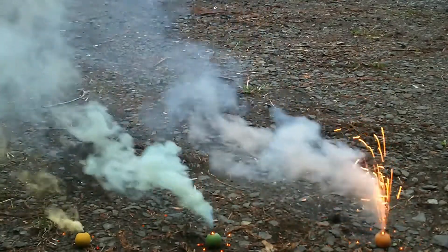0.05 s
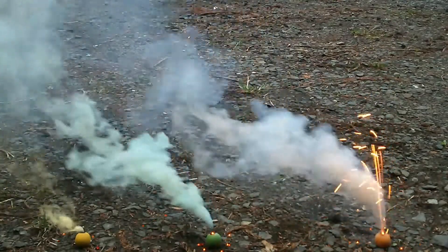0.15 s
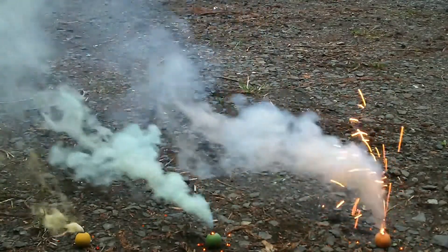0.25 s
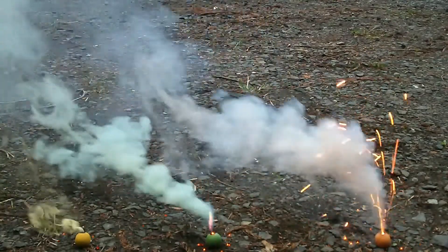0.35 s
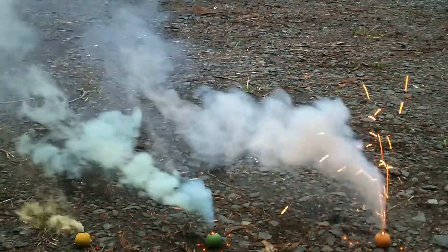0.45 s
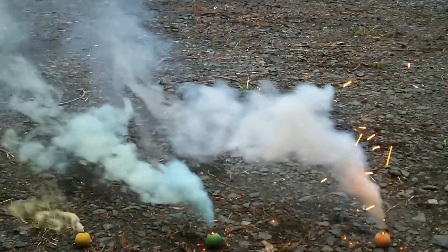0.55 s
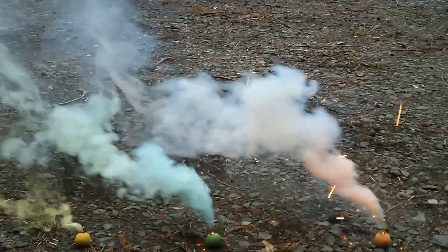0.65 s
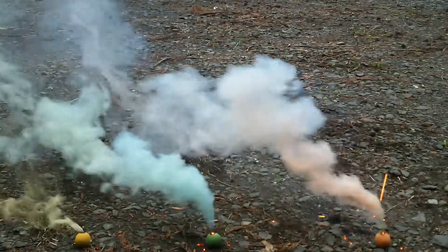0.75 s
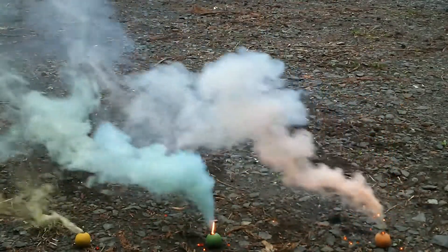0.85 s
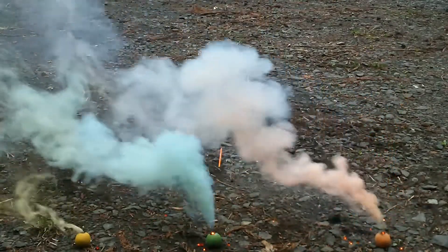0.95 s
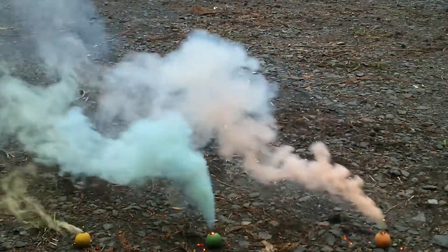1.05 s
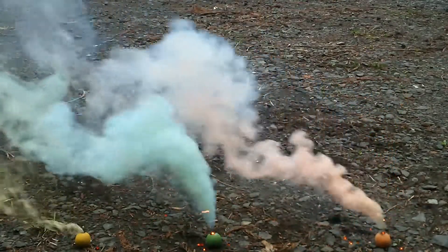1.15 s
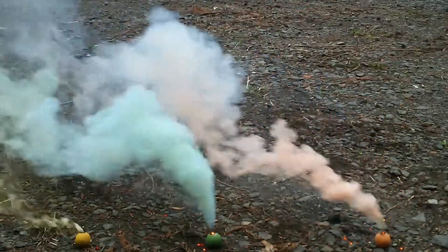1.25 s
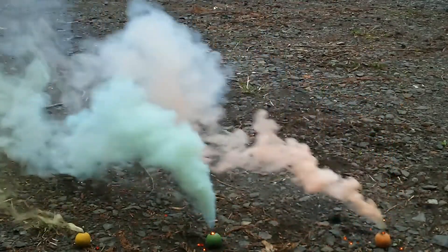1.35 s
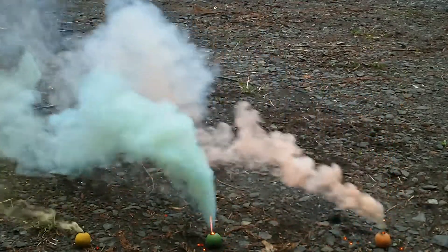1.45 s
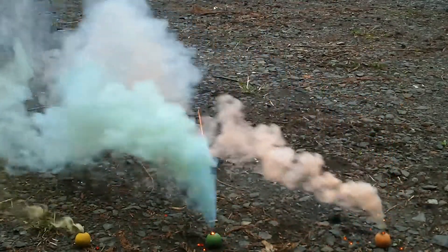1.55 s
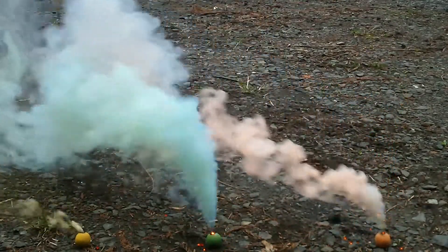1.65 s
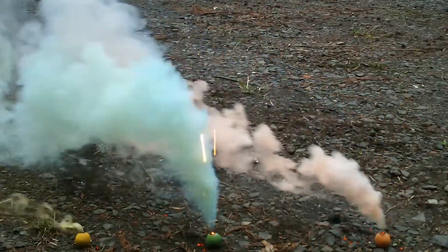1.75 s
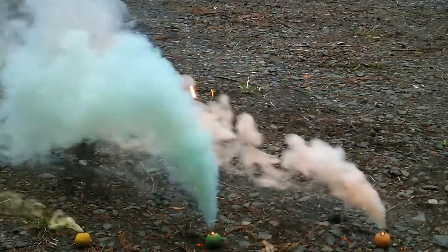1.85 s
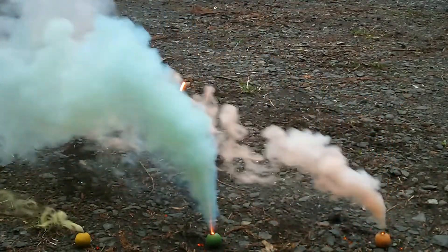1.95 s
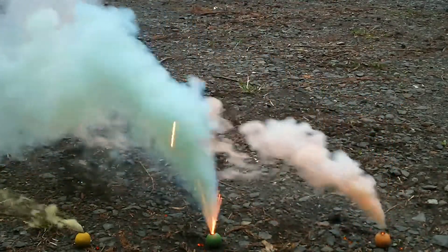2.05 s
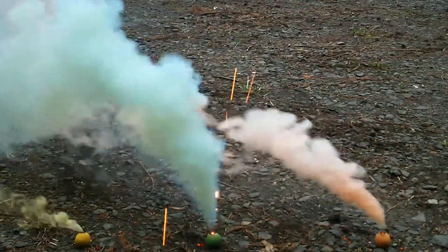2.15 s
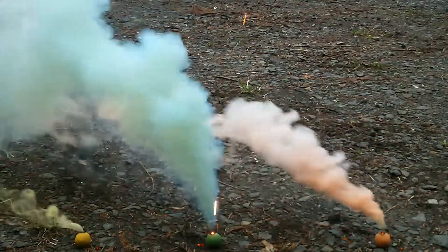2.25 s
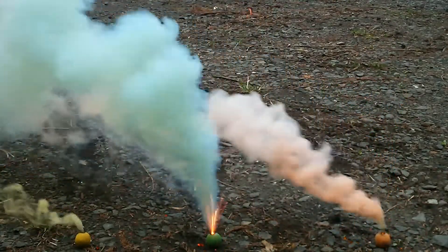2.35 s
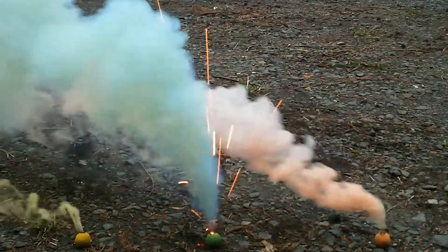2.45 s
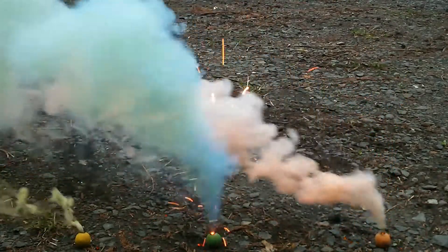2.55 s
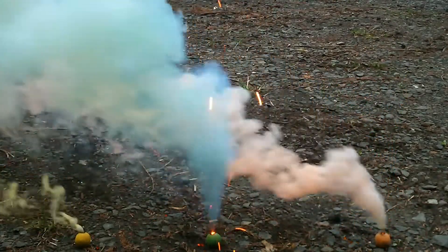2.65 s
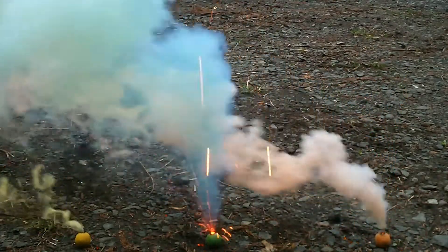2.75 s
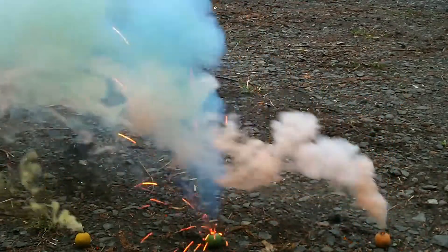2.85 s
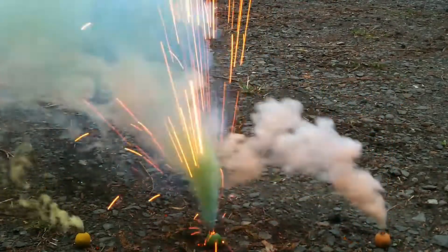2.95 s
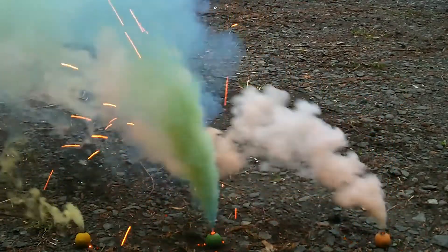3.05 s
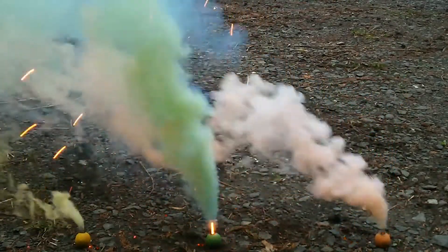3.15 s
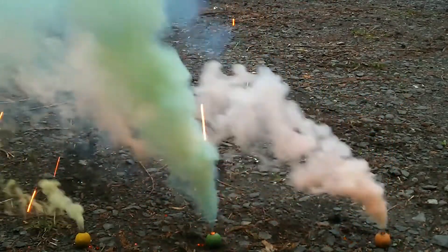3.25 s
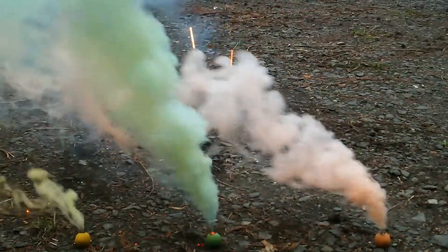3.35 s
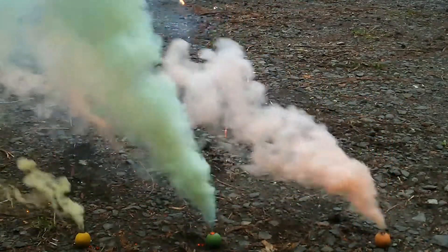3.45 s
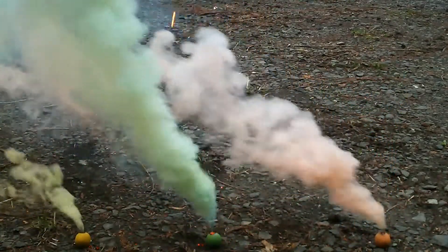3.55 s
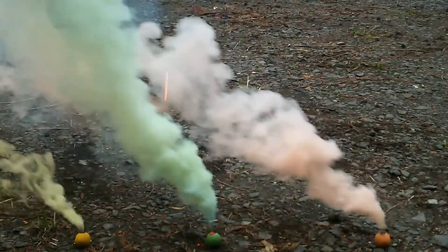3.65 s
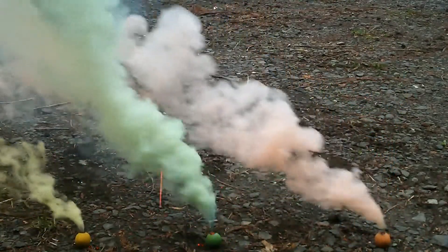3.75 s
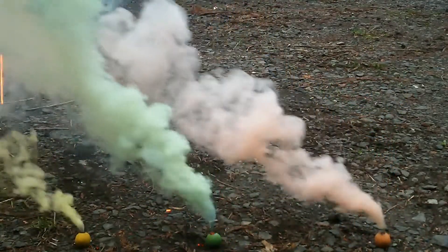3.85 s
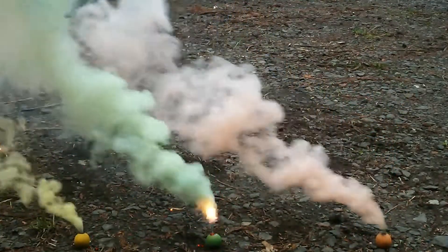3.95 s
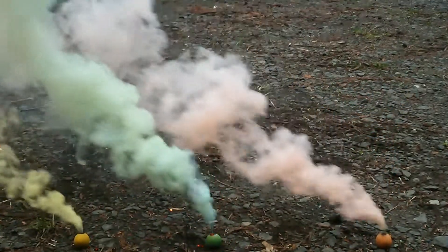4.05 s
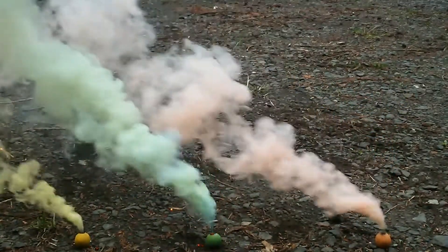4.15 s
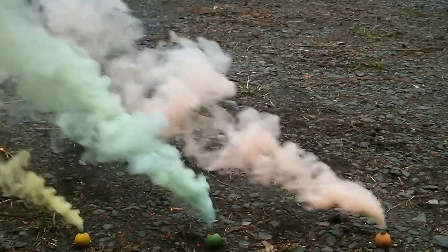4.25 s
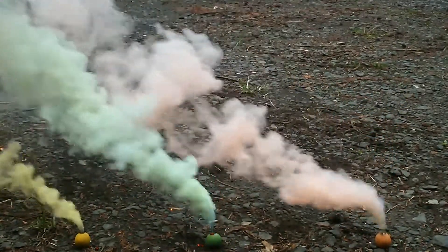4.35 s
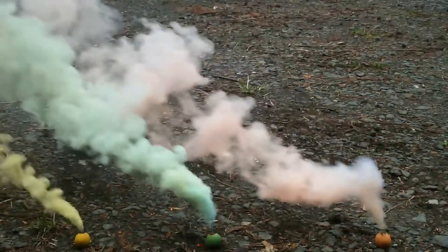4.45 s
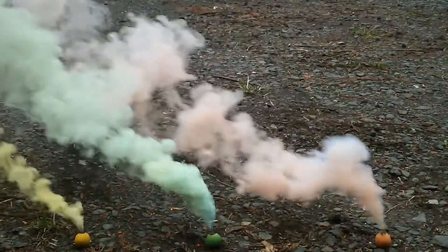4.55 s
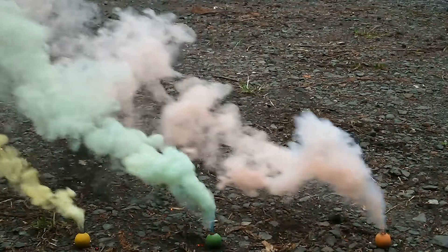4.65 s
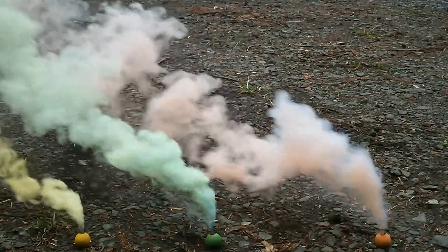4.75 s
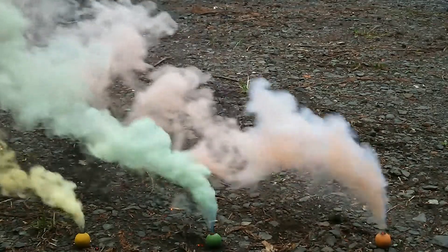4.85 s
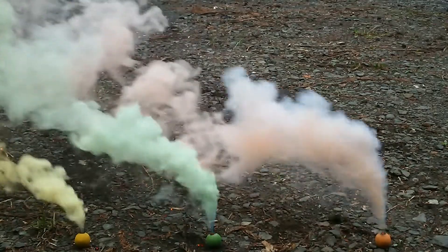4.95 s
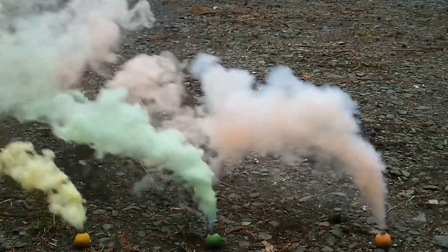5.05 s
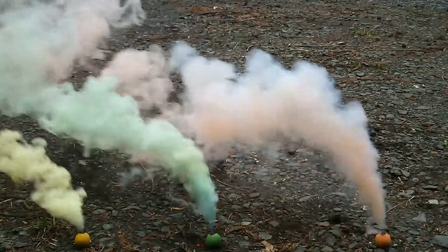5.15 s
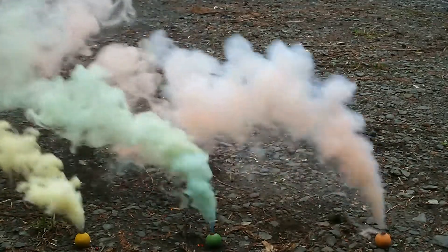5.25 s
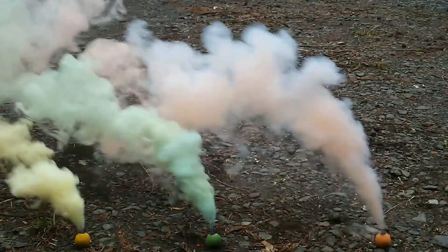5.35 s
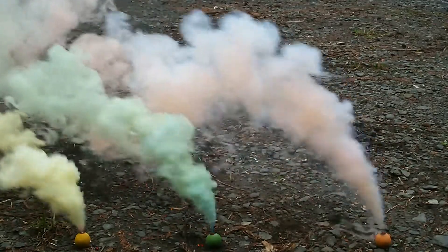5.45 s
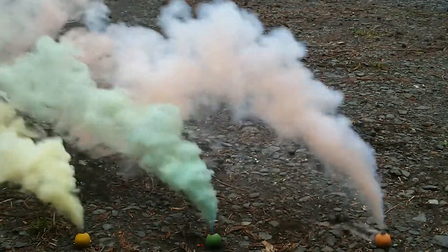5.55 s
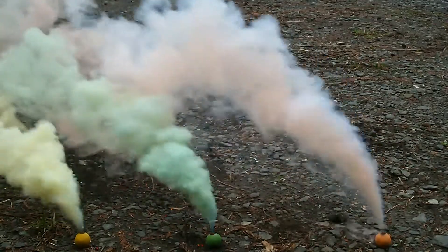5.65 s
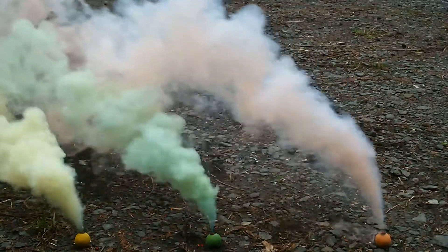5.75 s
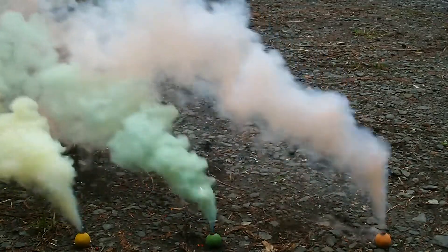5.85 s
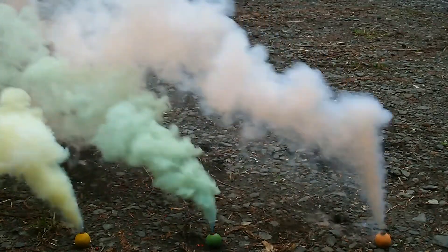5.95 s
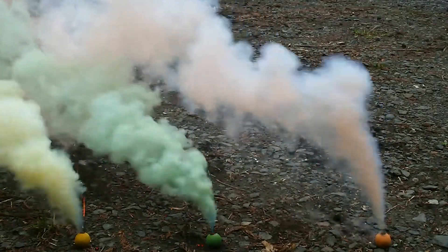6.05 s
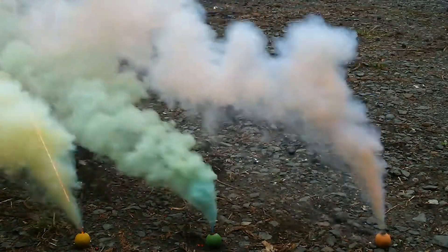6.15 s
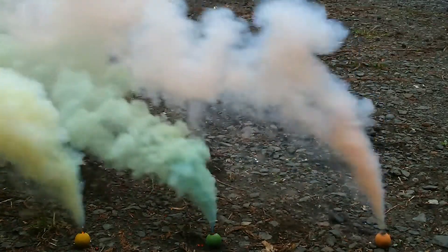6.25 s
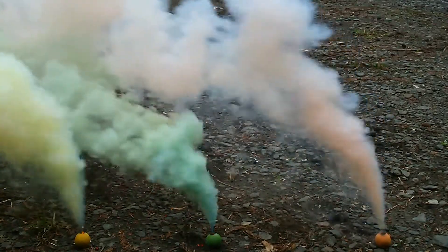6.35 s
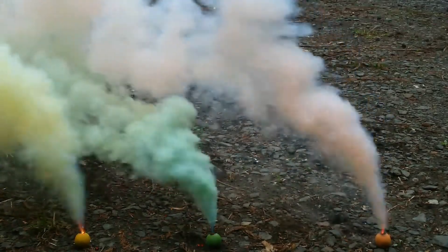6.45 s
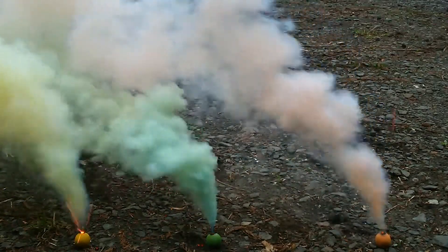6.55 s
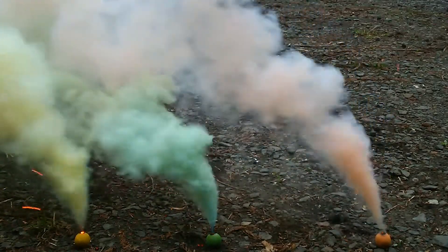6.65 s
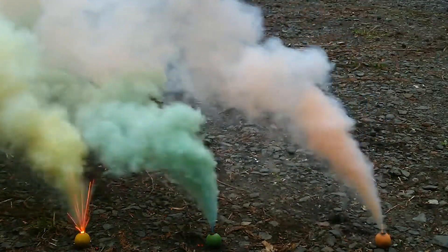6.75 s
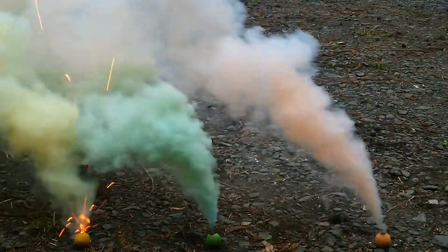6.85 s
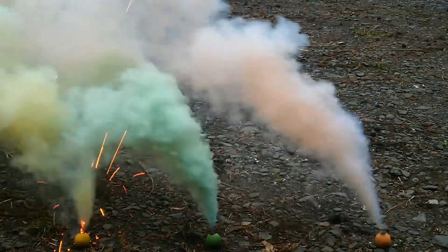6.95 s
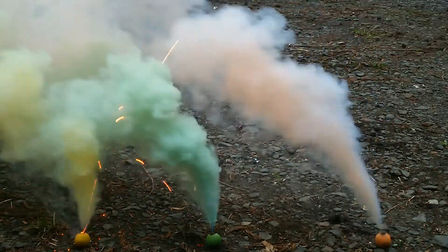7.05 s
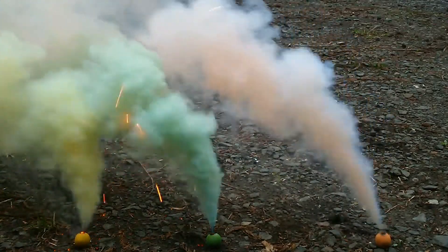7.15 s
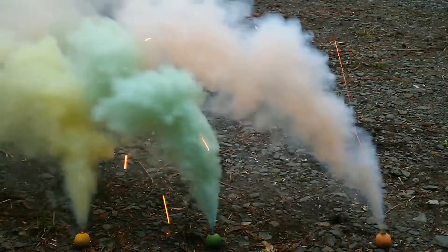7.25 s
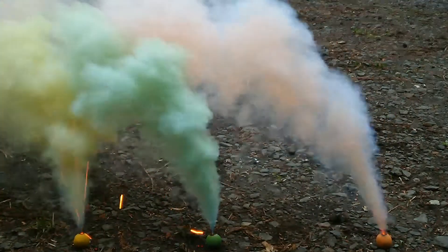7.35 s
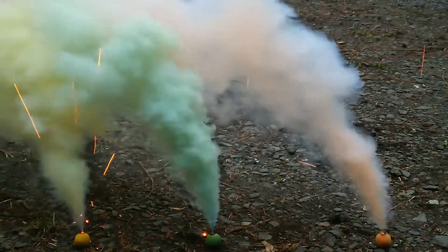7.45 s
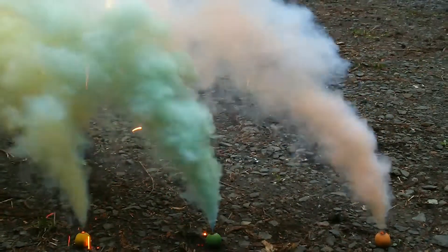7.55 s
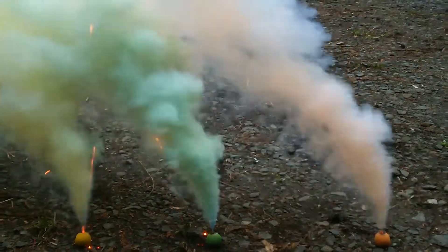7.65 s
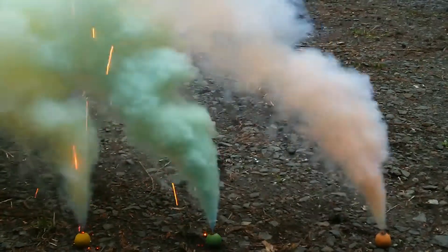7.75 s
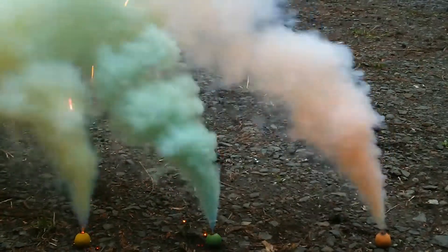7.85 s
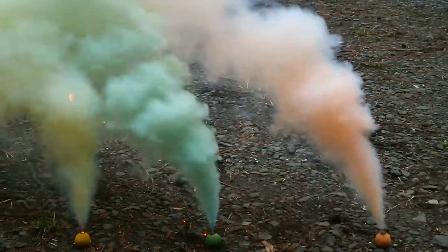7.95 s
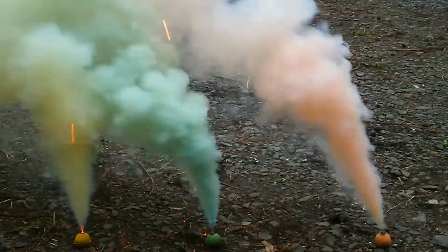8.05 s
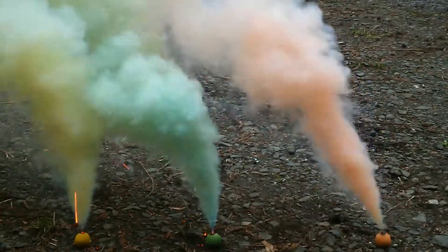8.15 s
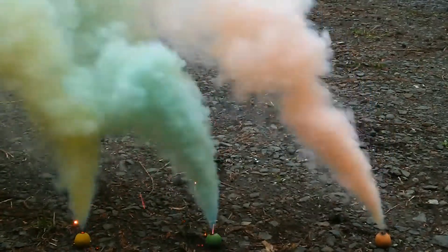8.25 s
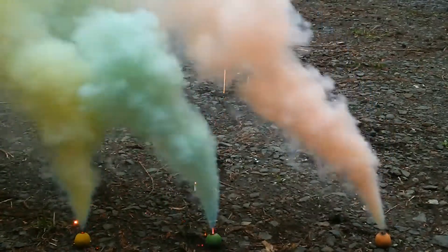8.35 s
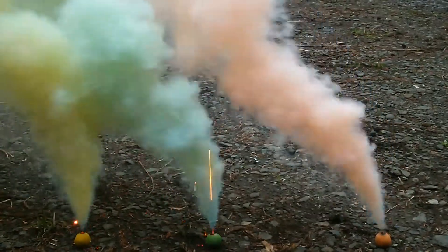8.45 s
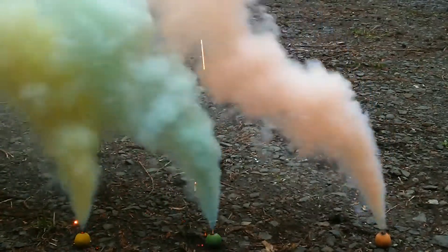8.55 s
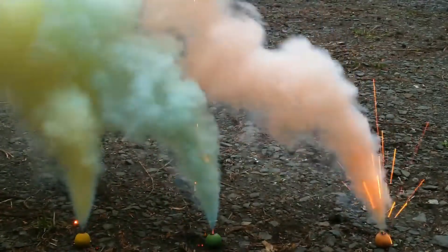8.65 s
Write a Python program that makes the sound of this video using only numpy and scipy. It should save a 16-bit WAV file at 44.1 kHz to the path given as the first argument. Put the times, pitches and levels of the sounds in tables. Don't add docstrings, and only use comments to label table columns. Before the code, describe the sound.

Close, gritty gas hiss from small fireworks on open ground. A sizzling fuse fades, a second vent swells into a forceful rush with a brief dip and spark clicks, and bursts in one hard, dry pop. Afterwards come thin airy wheezes and light sputtering over a low far engine hum, until two more jets build to a steady, strong hiss with dull coughs and sharp cracks. The microphone's gain sinks the background when jets are loud.

```python
import sys
import numpy as np
from scipy import signal
from scipy.fft import rfft, irfft, next_fast_len
from scipy.io import wavfile
from scipy.ndimage import uniform_filter1d

SR = 44100
rng = np.random.default_rng(int(sys.argv[2]) if len(sys.argv) > 2 else 0)


def boost(x):
    u = np.asarray(x, float) / 20
    return 10 ** u


def persist_wave(psi):
    counts = np.round(np.clip(psi, -1, 1) * 32767).astype(np.int16)
    wavfile.write(sys.argv[1], SR, np.atleast_2d(counts).T)


N = 384111
CUTOFF_HZ = 15200

# start_s, level_db
FUSE = [
    (0.0, -37),
    (0.2, -35),
    (0.3, -34.5),
    (0.5, -33),
    (0.6, -43),
    (0.7, -42),
    (0.8, -39.5),
    (1.1, -58),
    (1.3, -48),
]
MIDDLE_JET = [(.8, -64), (.93, -41.5), (1.39, -40.5), (1.62, -32.5), (2.38, -32.5), (2.72, -29.5),
              (3.01, -31), (3.04, -40), (3.27, -41.5)]
LEFT_JET = [(5.8, -45), (5.9, -38), (6.3, -34), (6.6, -32.5), (7.0, -38.5), (7.4, -32), (8.0, -29),
            (8.4, -31), (8.7, -29.5)]
RIGHT_JET = [(4.4, -56), (4.438, -46), (4.47, -39.5), (4.62, -39.5), (4.85, -36.5), (5.3, -38),
             (5.75, -37.5), (5.9, -34.5), (6.7, -39), (7.1, -35.5), (8.7, -37.5)]
# middle_s, change_db, length_s
LULL = [
    (2.32, -42, 0.2),
]


def in_time(rows):
    s, db = np.transpose(rows)
    t = np.arange(N) / SR
    since_start = t - s[0] + (s[0] < .05)
    until_end = s[-1] + .05 - t
    return boost(np.interp(t, s, db)) * np.clip(np.minimum(since_start, until_end) / .02, 0, 1)


def surges(rows):
    t = np.arange(N) / SR
    return sum(db * np.exp(-(2 * (t - s) / length) ** 2) for s, db, length in rows)


def rms_one(x):
    return x / np.sqrt(np.mean(x ** 2) + 1e-20)


def drift(per_s, size):
    r = np.exp(-2 * np.pi * per_s * 40 / SR)
    white = rng.standard_normal(size // 40 + 2002)
    slow = signal.lfilter([1], [1, -2 * r, r * r], white)[2000:]
    return np.interp(np.arange(size) / 40, np.arange(len(slow)), rms_one(slow))


def band_noise(white, low_hz, high_hz, order=1):
    return signal.sosfilt(signal.butter(order, [low_hz, high_hz], "band", fs=SR, output="sos"), white)


def coloured(x, colour, alike=0):
    # pitch_hz, share_0_to_1
    likeness = [(150, 0.6), (400, 0.92), (1000, 0.94), (2200, 0.86), (3500, 0.54), (4400, 0.5), (5000, 1.0),
                (8000, 1.0), (12500, 0.9), (14500, 1)]
    size = next_fast_len(x.shape[-1])
    hz = np.arange(size // 2 + 1) * SR / size + 1
    at, db = np.transpose(colour)
    low_cut = 1 + (at[0] / hz / 4.5) ** 4
    lines = rfft(x, size) * boost(np.interp(np.log(hz), np.log(at), db)) / low_cut
    if alike:
        share = np.clip(alike * np.interp(hz, *np.transpose(likeness)), 0, 1)
        lines[1] = share * lines[0] + np.sqrt(1 - share ** 2) * lines[1]
    octave = np.log2(hz / 1000)
    bass, high, top = np.clip([1 - octave, octave * 2 - 3.4, octave * 2 - 5.7], 0, 1)
    shares = (bass, 1 - bass - high, high - top, top)
    return [irfft(lines * share, size)[..., :x.shape[-1]] for share in shares]


def jet(blow, change_db, colour, flutter_db, flutter_per_s, spit_db, alike, brightens):
    start = max(0, round(blow[0][0] * 10) * SR // 10 - 4000)
    size = round((blow[-1][0] - blow[0][0]) * 2 + 1) * SR // 2
    grain_size = boost(7.5 * np.minimum(rng.exponential(1, size), 5))
    grains = (rng.random(size) < 900 / SR) * grain_size * rng.choice([-1, 1], size)
    direct = rng.standard_normal(size) + boost(spit_db) * rms_one(grains)
    both = np.array([direct, rng.standard_normal(size)])
    flow_db = 2.2 * flutter_db * np.tanh(drift(flutter_per_s, size) / 2)
    bands = [band * boost(flow_db + 1.29 * flutter_db * drift(16.5, size)) for band in coloured(both, colour, alike)]
    gain = in_time(blow) * boost(change_db)
    effort = np.resize(gain[start:start + size] / gain.max(), size)
    bands[-1] = bands[-1] * effort ** brightens
    out = np.zeros((2, N))
    out[:, start:start + size] = rms_one(sum(bands))[:, :N - start]
    return gain * out


def wheezes(rows):
    out, t = np.zeros(N), np.arange(-4000, 4000) / SR
    for s, level_db, length, hz in rows:
        band = band_noise(rng.standard_normal(8000), 0.87 * hz, 1.13 * hz, 2)
        i = round(s * SR) - 4000
        out[i:i + 8000] += boost(level_db) * rms_one(band) * np.exp(-(2 * t / length) ** 2)
    return out


def coughs(rows):
    out, t = np.zeros(N), np.arange(8000) / SR
    for s, level_db, length, dull_hz in rows:
        puff = band_noise(rng.standard_normal(8000), 70, dull_hz)
        puff = signal.sosfilt(signal.butter(1, 2 * dull_hz, fs=SR, output="sos"), puff)
        puff *= (1 - np.exp(-t / 0.00094)) * np.exp(-(t / length) ** 1.2)
        i = round(s * SR)
        out[i:i + 8000] += boost(level_db + 3) * puff / np.abs(puff).max()
    return out


def cracks(rows):
    out, t = np.zeros(N + 2000), np.arange(2000) / SR
    for s, peak_db, dull_hz in rows:
        w = t * abs(dull_hz) * 2.2
        i = round(s * SR)
        pulse = 2.5 * (w - w * w / 2.5) * np.exp(-w)
        out[i:i + 2000] += np.sign(dull_hz) * boost(peak_db) * pulse
    return out[:N]


def ducking():
    rest_db, recover_s = -40.5, 0.37
    power = sum(in_time(blow) ** 2 for blow in (FUSE, MIDDLE_JET, LEFT_JET, RIGHT_JET)) + boost(-41.5) ** 2
    return uniform_filter1d(10 * np.log10(power), int(recover_s * SR), mode="nearest") - rest_db


def drone(ducked):
    # start_s, level_db
    engine_level = [(0.0, -59.5), (8.71, -59)]
    # start_s, pitch_hz
    hum = [(0.0, 53.1), (1.5, 55), (2.6, 60.3), (8.71, 61.7)]
    # middle_s, change_db, length_s
    swells = [(0.67, 6, 0.18), (1.4, 8, 0.071), (1.94, 6, 0.12), (3.5, 4, 0.16), (4.12, 6.5, 0.5),
              (5.68, 6.5, 0.73), (7.1, -3, 0.2), (.1, 7, .2), (7, 6, .1), (2.8, -8, .1)]
    wavers_per_s, sinks = 5.9, 0.66
    rumble, own, deep = rng.standard_normal((3, N + SR))
    turn = 2 * np.pi * np.cumsum(np.interp(np.arange(N) / SR, *np.transpose(hum))) / SR
    note = (0.98 + drift(wavers_per_s, N)) * np.sin(turn) + drift(wavers_per_s, N) * np.cos(turn)
    wide = rms_one(band_noise(rumble, 45, 140)[SR:])
    wind = rms_one(band_noise(deep, 14, 36, 2)[SR:])
    common = rms_one(note) + 0.5 * wide + 0.47 * wind
    apart = 0.42 * rms_one(band_noise(own, 45, 75)[SR:])
    engines = in_time(engine_level) * boost(10.0) * np.array([common + apart, common - apart])
    return engines * boost(surges(swells) - sinks * ducked)


def hiss_floor():
    # pitch_hz, level_db_per_hz
    colour = [(300, -9), (2000, -2), (4000, 0.5), (6500, -4), (9000, -8), (14500, -17.5)]
    return boost(-55.0) * rms_one(sum(coloured(rng.standard_normal((2, N)), colour)))


def smoulder(lull, ducked):
    # start_s, level_db
    blow = [(0.0, -45.5), (8.6, -44)]
    # pitch_hz, level_db_per_hz
    colour = [(250, -6), (500, -4.5), (900, -7), (1500, -5), (2300, -3), (3000, -8), (3800, -26),
              (4400, -22), (4900, -16.5), (5500, -15), (6200, -17), (8000, -19.5), (10500, -33),
              (14500, -38)]
    # middle_s, change_db, length_s
    changes = [(.2, -4, 0.13), (.4, -2, .06), (5.55, -1, 0.31), (2.8, 16, 0.13), (3.45, 4, 0.57),
               (3.68, 4.5, 0.13), (4.0, -1, 0.26), (4.55, 6, 0.18), (5.3, -2.5, 0.27), (7.2, 6, 1),
               (8.2, -12, .25)]
    change_db = surges(changes) + 0.12 * lull - 0.52 * ducked
    return jet(blow, change_db, colour, flutter_db=2.1, flutter_per_s=0.55, spit_db=-9.5, alike=0.52, brightens=0.6)


def sputter(lull):
    # start_s, level_db
    blow = [(0.4, -52), (.85, -42.5), (1.5, -43.5), (2.0, -41), (2.9, -37), (3.05, -52), (3.2, -38.5),
            (3.3, -44), (3.4, -65), (3.95, -55.5), (4.25, -53.5), (4.8, -44), (5.5, -55.5), (5.8, -45.5)]
    # pitch_hz, level_db_per_hz
    colour = [(250, -33), (500, -7), (900, 0.5), (1500, -1.5), (2300, 3), (3000, 5.5), (3800, 3), (4400, 2),
              (4900, -16), (5500, -26), (6200, -17), (8000, -24), (10500, -53), (14500, -96)]
    # middle_s, change_db, length_s
    changes = [(1.08, -4.5, 0.13), (3.7, 11, .12), (4.27, 5, .06), (4.4, -8, 0.19), (5.3, 4.5, 0.11)]
    # middle_s, left_s
    moves = (.9, 3.12)
    spitting = jet(blow, surges(changes) + lull, colour,
                   flutter_db=1.23, flutter_per_s=38, spit_db=-8.0, alike=0.73, brightens=.66)
    early, late = (np.clip((np.arange(N) / SR - s) * 10 + .5, 0, 1) for s in moves)
    return spitting * (1 - early), spitting * (early - late), spitting * late


def right_ball():
    # pitch_hz, level_db_per_hz
    fuse_colour = [(250, -22), (900, -11), (1500, -17), (3000, -12), (3900, -12), (4300, -11), (4600, 0),
                   (5000, 6), (5500, -2.5), (6200, -9), (8000, -18.5), (10500, -32), (14500, -57)]
    jet_colour = [(250, -22), (500, -11.5), (900, -16), (1500, -28), (2300, -8.5), (3000, -11.5),
                  (3800, -16.5), (4350, -12.5), (4700, 0), (5150, 1), (5700, -2), (6300, -2), (7100, -5),
                  (8000, -7), (10500, -16), (14500, -24)]
    # middle_s, change_db, length_s
    fuse_changes = [(.045, -2.5, 0.036), (.13, -2, .02), (.32, 3, .012), (.335, -2, .015), (.36, 2, .03),
                    (.415, -6, 0.018), (.51, -1, .02), (.545, 2, .02), (.7, -2, .03), (.8, 1, .025),
                    (.84, -11, .02)]
    jet_changes = [(5.6, 0, 0.13), (5.18, -6, 0.072), (5.35, -1, .15), (6.2, 1, 0.22), (7.4, 1, 0.092),
                   (7.6, 2.5, 0.1), (8.6, 1, 0.049)]
    # middle_s, level_db, length_s, pitch_hz
    whistling = [(.11, -32, 0.016, 5000), (.17, -36, 0.047, 5130), (.29, -33.5, 0.057, 5370),
                 (.648, -36, 0.024, 4730), (.745, -34, 0.06, 4500), (.85, -40, 0.043, 3750),
                 (1.23, -35, 0.015, 4800), (1.708, -33, 0.011, 4530)]
    fizz = jet(FUSE, surges(fuse_changes), fuse_colour,
               flutter_db=0.75, flutter_per_s=50, spit_db=-15, alike=0.93, brightens=0.61)
    gas = jet(RIGHT_JET, surges(jet_changes), jet_colour,
              flutter_db=0.71, flutter_per_s=5.0, spit_db=-24, alike=0.69, brightens=0.68)
    return fizz + gas + wheezes(whistling)


def left_ball():
    # pitch_hz, level_db_per_hz
    colour = [(250, -14.5), (500, -5.5), (900, -2.5), (1500, -2.5), (2300, 1.2), (3000, 0.4), (3800, -1),
              (4400, -1.5), (4900, -7.5), (5500, 0), (6200, 2), (8000, -5), (10500, -13.5), (14500, -31)]
    # middle_s, change_db, length_s
    changes = [(5.92, 5, 0.071), (6.3, 2.5, 0.13), (6.58, 3, .12), (6.05, -1, 0.089), (6.7, 1, 0.069),
               (7.05, 3, 0.046), (7.4, 0, 0.051), (7.6, -0.5, 0.054), (6.85, 5, 0.13), (8.0, 2, 0.052),
               (8.18, 0, 0.14), (8.5, 0.5, 0.16)]
    # start_s, level_db, length_s, dull_above_hz
    slag = [(5.874, -30, 0.0093, 1200), (5.913, -20.5, 0.008, 980), (6.255, -31, 0.0086, 900),
            (6.56, -29, 0.022, 900), (6.957, -24, 0.01, 400), (6.975, -21, 0.014, 500),
            (7.005, -26, 0.0043, 2000), (7.315, -27, 0.029, 800), (7.462, -28, 0.008, 1500),
            (8.38, -38, 0.021, 130), (5.912, -23.5, 0.019, 170)]
    # middle_s, level_db, length_s, pitch_hz
    whistling = [(3.2, -59, 0.045, 2500), (3.275, -37.5, 0.046, 2900), (3.44, -42.5, 0.043, 3000),
                 (3.51, -40, 0.075, 3070), (3.605, -34.5, 0.051, 3160), (3.672, -36, 0.048, 2480),
                 (3.73, -45, 0.061, 2670), (3.85, -43, 0.25, 1660), (4.0, -37.5, 0.12, 1700),
                 (4.07, -41, .04, 1740), (4.15, -44.5, 0.055, 1960), (4.26, -45, 0.083, 2000),
                 (4.39, -46, 0.094, 1850), (4.65, -39.5, 0.032, 3200), (4.7, -39.5, 0.082, 2770),
                 (4.81, -40, 0.061, 2930), (4.95, -44.5, 0.063, 990), (5.055, -45, 0.07, 2580),
                 (5.13, -41, 0.056, 2620), (5.26, -40.5, 0.1, 2240), (3.63, -50, .07, 6500),
                 (3.74, -51, .04, 6800), (4.15, -52, .04, 6500), (6.13, -45, 0.096, 3200),
                 (6.3, -49, 0.19, 2800), (6.56, -40, 0.079, 2900), (6.575, -43, 0.038, 1300),
                 (6.86, -50, 0.046, 1900), (7.95, -44, .12, 3300), (8.02, -39, 0.086, 1900)]
    # start_s, peak_db, dull_above_hz (minus for a suction)
    spits = [(5.916, -12, 1200), (6.118, -26, -1300), (6.294, -21, 1000), (6.68, -23, 1800),
             (7.006, -12, -1800), (7.161, -24, 1300), (7.471, -14, 2200), (8.56, -20, -1000),
             (8.595, -17, 1500)]
    gas = jet(LEFT_JET, surges(changes), colour,
              flutter_db=0.78, flutter_per_s=28, spit_db=-12.5, alike=0.75, brightens=0.45)
    return gas + coughs(slag) + wheezes(whistling) + cracks(spits)


def pop():
    # start_s, peak_db, dull_above_hz (minus for a suction)
    bangs = [
        (3.0130, -1, -1700),
        (3.0136, 3, 2600),
        (3.0143, -3, -2200),
        (3.0154, -2.5, 900),
        (3.0184, -9.5, -600),
        (3.0213, -9, 900),
        (3.0247, -12, -900),
        (3.0309, -7, 1500),
        (3.0443, -17, 1500),
    ]
    # pitch_hz, level_db_per_hz
    colour = [(80, -30), (500, -33), (1500, -8), (3000, -7), (4000, -9), (5800, -7), (7500, -13),
              (10000, -23.5), (14000, -50)]
    out, t = cracks(bangs), np.arange(6000) / SR
    i = round(bangs[0][0] * SR)
    gas = rms_one(sum(coloured(rng.standard_normal(6000), colour)))
    burst = (boost(-7) * np.exp(-t / .0055) + boost(-29) * np.exp(-t / .025)) * (1 - np.exp(-t / .0006))
    push_shape = (1 - np.exp(-t / .002)) * np.exp(-t / .008)
    push = boost(-12) * np.sin(2 * np.pi * 125 * (t - .0015)) * push_shape
    out[i:i + 6000] += gas * burst + push
    return signal.sosfilt(signal.butter(4, 10500, fs=SR, output="sos"), out + 1e-18)


def middle_ball(lull):
    # start_s, level_db
    roar_blow = [(2.0, -48), (2.4, -53), (2.5, -44), (2.6, -46), (2.7, -37.5), (2.9, -45.5), (3.03, -35),
                 (3.2, -37.5), (3.4, -49)]
    # pitch_hz, level_db_per_hz
    jet_colour = [(250, -15.5), (500, -51), (900, -16), (1500, -12), (2300, -8.5), (3000, -7), (3800, -12),
                  (4400, -7), (4900, -6), (5500, 1), (6200, 2), (8000, -6), (10500, -18), (14500, -27)]
    roar_colour = [(250, -7), (500, 2.5), (900, 2.5), (1500, 2), (2300, -2.5), (3000, -2.5), (3800, -9),
                   (4400, -11), (4900, -6), (5500, -4), (6200, -6), (8000, -31), (10500, -46.4),
                   (14500, -62.1)]
    # middle_s, change_db, length_s
    changes = [(.95, 3.5, 0.094), (1.16, 3, 0.03), (1.32, 5, 0.048), (1.5, 1.5, 0.14), (1.86, -3, .06),
               (2.0, 0.5, 0.074), (2.1, -1.5, 0.11), (2.43, -1, .05), (2.68, 1.5, 0.027), (2.79, 1, 0.035),
               (3.24, -11, 0.024)]
    # start_s, level_db, length_s, dull_above_hz
    slag = [(.63, -31, 0.0099, 600), (.992, -31.5, 0.012, 600), (2.066, -30, 0.0051, 1500),
            (2.396, -29, 0.01, 1520), (2.463, -26.5, 0.0091, 1500), (2.673, -26, 0.012, 1300),
            (2.792, -27, 0.014, 600), (2.856, -24.5, 0.012, 900), (3.3, -34, .03, 500),
            (4.083, -23.5, 0.025, 220)]
    # start_s, peak_db, dull_above_hz (minus for a suction)
    spits = [(.280, -27, 1500), (2.068, -19, -1200), (2.169, -20, 1800), (2.400, -29, -2000),
             (2.471, -28, 1500), (2.6725, -8, -2200), (2.856, -13, 1400), (3.998, -36, 1200)]
    gas = jet(MIDDLE_JET, surges(changes), jet_colour,
              flutter_db=0.87, flutter_per_s=44, spit_db=-24, alike=0.83, brightens=0.72)
    roar = jet(roar_blow, 0.3 * lull, roar_colour,
               flutter_db=1.6, flutter_per_s=19, spit_db=-15, alike=0.98, brightens=.66)
    return gas + roar + coughs(slag) + cracks(spits) + pop()


def ports(pair, phase):
    # pitch_hz, left_minus_right_db
    cavities = [(60, -1), (300, -2.5), (900, -2), (2500, 0), (3600, 1), (4400, -0.5), (5100, -5),
                (5650, -9.5), (6400, -3.5), (7600, 2), (11000, 1.5), (15000, -0.5)]
    # pitch_hz, width_hz, change_db
    dips = [(4250, 150, -1), (8140, 150, -3), (15900, 250, -4)]
    size = next_fast_len(N)
    hz = np.arange(size // 2 + 1) * SR / size
    balance = boost(np.interp(hz, *np.transpose(cavities)))
    right = np.sqrt(2 / (1 + balance ** 2)) / np.sqrt(1 + (38 / (hz + 1)) ** 4)
    right *= boost(sum(db * np.exp(-((hz - at) / width) ** 2) for at, width, db in dips))
    turn = np.exp(1j * np.interp(hz, *np.transpose(phase)))
    return irfft(rfft(pair, size) * [right * balance, right * turn] * (hz < CUTOFF_HZ), size)[:, :N]


def scene():
    # pitch_hz, turn_radians
    from_right = [(100, -3.14), (2000, -3.0), (3500, -2.5), (4600, -1.5), (5500, -1.5), (5800, -2.3),
                  (6800, -2.3), (7400, -1.9), (8200, -1.2), (9300, -1.2), (10200, 0), (15000, 0)]
    from_middle = [(50, 3.55), (110, 3.45), (200, 3.15), (500, 2.85), (900, 2.75), (1500, 2.7), (2800, 2.2),
                   (3700, 2.3), (4500, 2.7), (5300, 2.3), (6200, .5), (7000, 0), (8500, .4), (9300, 0),
                   (15000, 0)]
    from_left = [(180, 3.1), (500, 2.8), (1500, 2.55), (2500, 2.2), (3100, 1.1), (3900, .9), (4700, -.9),
                 (5400, -1.0), (6000, -2.0), (7000, -2.6), (7800, -3.1), (9300, -3.4), (10500, -4.6),
                 (11500, -4.5), (12600, -6.28), (15000, -6.28)]
    lull, ducked = surges(LULL), ducking()
    background = drone(ducked) + hiss_floor() + smoulder(lull, ducked)
    sputter_right, sputter_middle, sputter_left = sputter(lull)
    right = right_ball() + sputter_right
    left = left_ball() + sputter_left
    middle = background + middle_ball(lull) + sputter_middle
    return ports(right, from_right) + ports(middle, from_middle) + ports(left, from_left)


def band_limit(x):
    return signal.sosfilt(signal.butter(12, 15410, fs=SR, output="sos"), x)


def record(dry):
    top_cut = signal.cheby2(8, 40, CUTOFF_HZ + 400, fs=SR, output="sos")
    mix = signal.sosfilt(top_cut, np.tanh(dry)) - .0019
    return band_limit(mix)


dry = scene()
out = record(dry)
persist_wave(out)
```